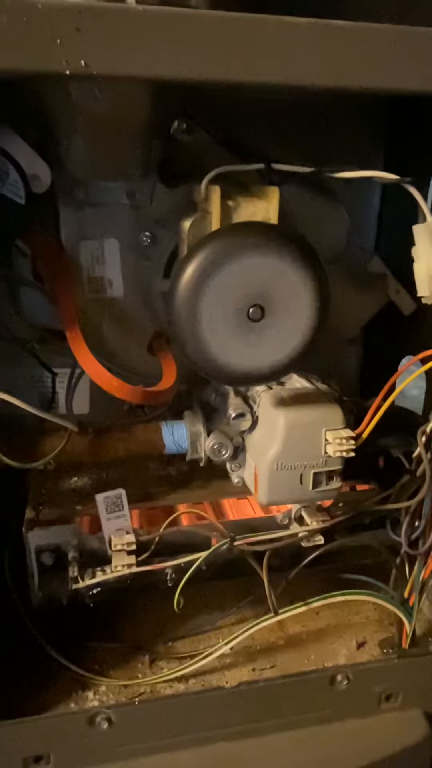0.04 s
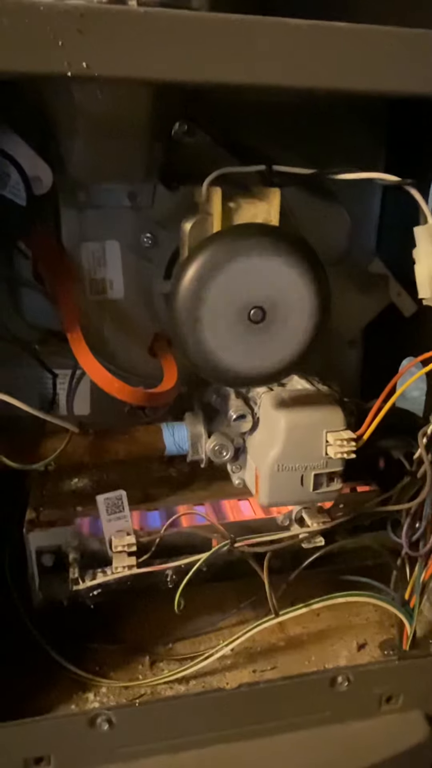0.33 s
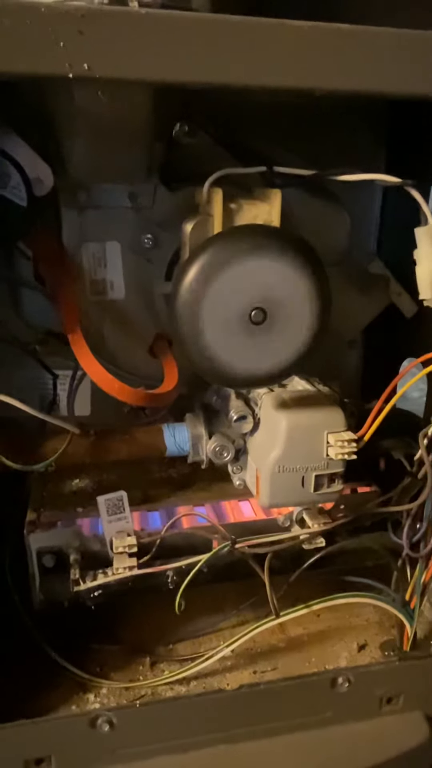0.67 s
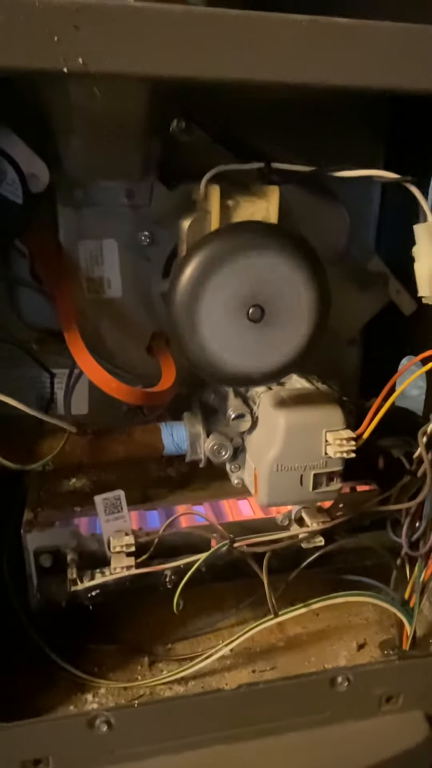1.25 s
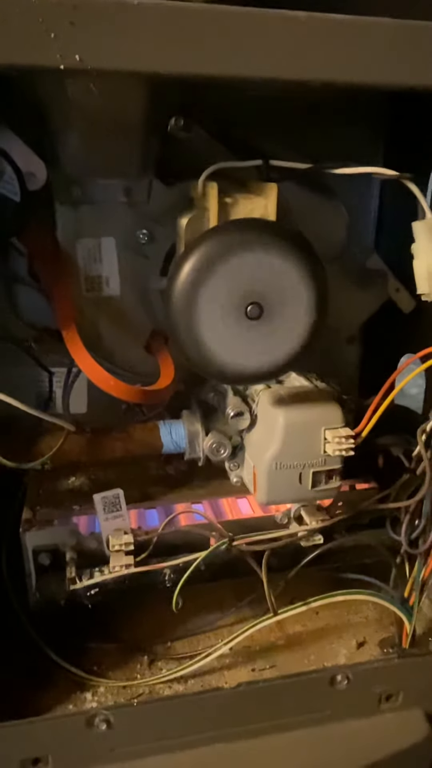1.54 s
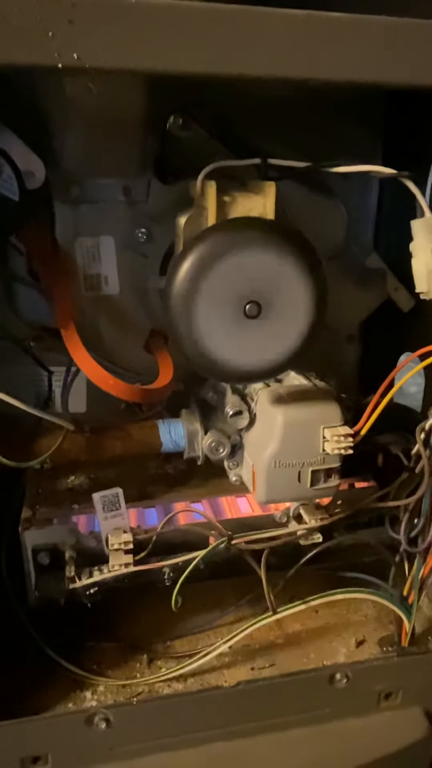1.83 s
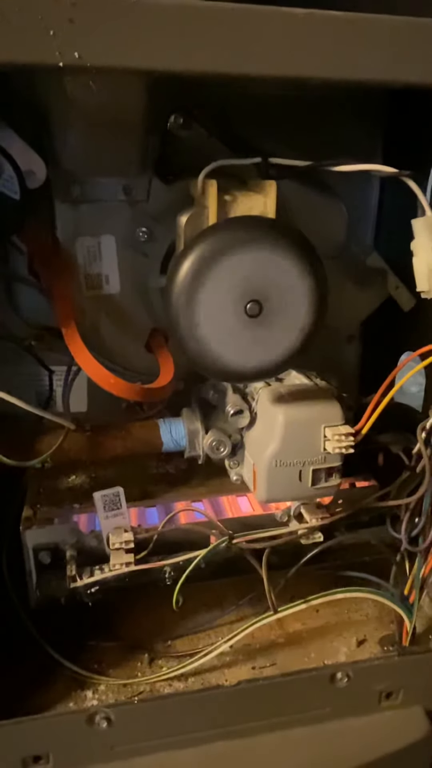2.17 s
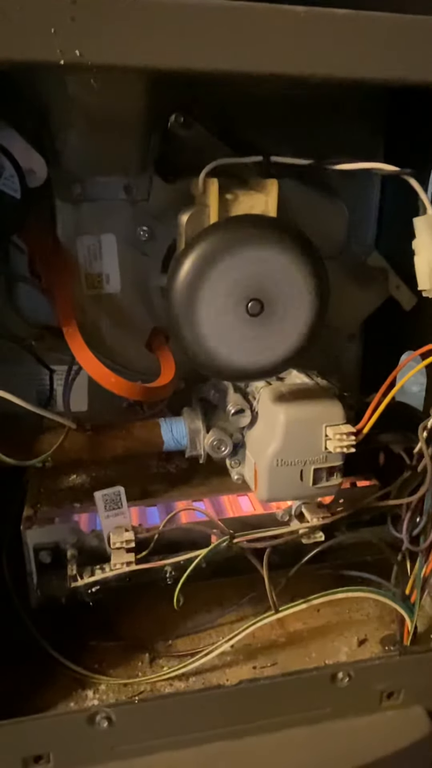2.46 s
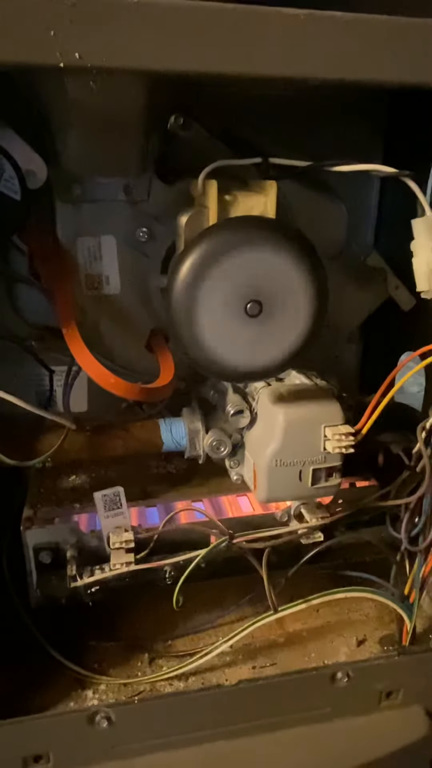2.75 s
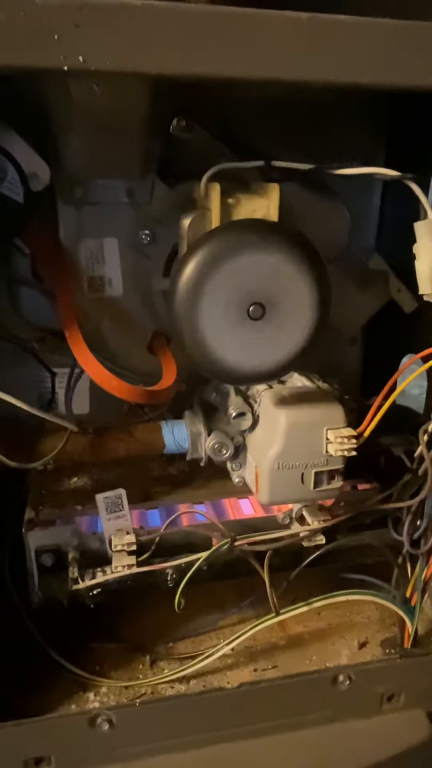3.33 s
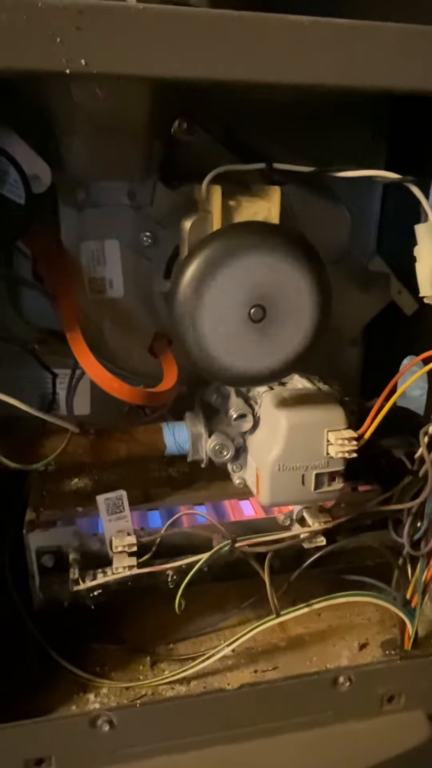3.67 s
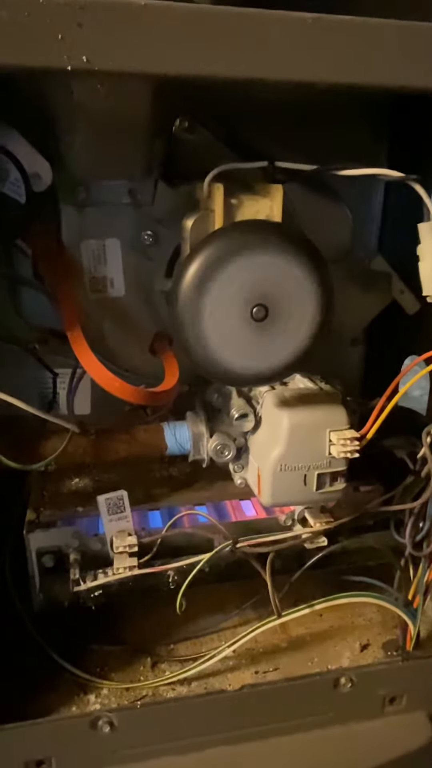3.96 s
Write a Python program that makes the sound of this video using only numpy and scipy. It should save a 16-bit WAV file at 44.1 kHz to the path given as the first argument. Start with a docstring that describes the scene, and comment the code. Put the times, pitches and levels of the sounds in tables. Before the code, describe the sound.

A gas furnace runs close by indoors, its small blower rushing, whining and humming from the start while low flames flutter. At about 0.5 seconds the burners catch with a puff and build into a roar over a deep, lumpy rumble, and the gas hiss brightens. The blower speeds up slightly between 0.5 and 2 seconds, and the furnace burns steadily until the end at about 4 seconds.

```python
"""A gas furnace heard close up at its open cabinet, indoors.
From the start a small draught blower rushes, whines and hums while low flames flutter.
Over the first second the gas valve opens to full flow: the flames catch with a puff, then roar
into the heat exchanger tubes over a lumpy rumble, and the hiss of the jets brightens.
As the flue gas gets hot the blower speeds up slightly, and the furnace burns on to the end."""
import sys
import numpy as np
from scipy import signal
from scipy.fft import rfft, irfft
from scipy.io import wavfile
from scipy.ndimage import uniform_filter1d, map_coordinates

SR = 44100
rng = np.random.default_rng(int(sys.argv[2]) if len(sys.argv) > 2 else 0)


def int16_out(signal):
    """Quantize to a 16-bit WAV file."""
    q = np.round(np.clip(np.atleast_2d(signal).T, -1, 1) * 32767)
    wavfile.write(sys.argv[1], SR, q.astype(np.int16))


N = 176400
TIME, HZ = np.arange(N) / SR, np.maximum(np.arange(N // 2 + 1) * SR / N, 1)

# the blower picking up speed: (time [s], shaft speed [turns/s])
SHAFT_SPEED = [(0, 57.2), (.48, 57.15), (.75, 57.65), (1.1, 58.02), (1.7, 58.2), (2.6, 58.24), (4, 58.24)]


def from_db(db):
    """Decibels to gain."""
    return 10 ** (np.asarray(db) / 20)


def rms_one(x):
    """Scale to rms 1."""
    return x / np.sqrt(np.mean(x ** 2) + 1e-20)


def in_time(points):
    """An automation curve at every sample."""
    return np.interp(TIME, *np.transpose(points))


def over_hz(points):
    """A curve at every frequency, joined on a log axis."""
    hz, value = np.transpose(points)
    return np.interp(np.log(HZ), np.log(hz), value)


def spectrum(points, skirt_db_per_octave=31):
    """EQ gain at every frequency, rolling off above the last point."""
    octaves_above = np.maximum(np.log2(HZ / points[-1][0]), 0)
    return from_db(over_hz(points) - skirt_db_per_octave * octaves_above)


def resonance(hz, width_hz):
    """Gain of a resonance with steep skirts."""
    return 1 / (1 + ((HZ - hz) / (.7 * width_hz)) ** 2)


def drift(rate_hz):
    """Slow random modulation, rms 1."""
    return rms_one(irfft(rfft(rng.standard_normal(N)) / (1 + (HZ / rate_hz) ** 2), N))


def bump(at_s, half_s):
    """A bell-shaped envelope of height 1."""
    return np.exp(-.5 * ((TIME - at_s) / half_s) ** 2)


def sine(cycles):
    """A sine with a random starting phase, rms 1."""
    return np.sqrt(2) * np.sin(2 * np.pi * (cycles + rng.random()))


def turbulence(colour):
    """Coloured stereo noise whose balance, width and phase vary with frequency, rms 1."""
    # panning: (frequency [Hz], left minus right [dB])
    balance = [(100, 0.1), (230, 1), (380, 2), (480, 5), (700, 8.5), (900, 4), (1300, 3.5), (1700, -1),
               (2200, -2.5), (2600, -2.5), (3100, 3.5), (3500, -1), (4400, -1.5), (5500, -0.5), (12000, 1)]
    # how alike the two sides are: (frequency [Hz], likeness [0-1])
    likeness = [(100, 1), (250, 1), (500, 0.98), (700, 0.95), (850, 0.37), (1100, 0.69), (1700, 0.8),
                (2280, 0.9), (2700, 0.43), (4500, 0.24), (5200, 0.81), (6100, 0.97), (6600, 1), (8100, 1),
                (8900, 0.2), (10200, .97), (12000, 0.6), (13100, .99), (14600, 0.99)]
    # phase between the sides: (frequency [Hz], left lead [rad])
    lead = [(280, 0), (460, .4), (720, .3), (900, -.55), (1400, -.4), (2300, .2), (3000, 1.4), (4400, 1.4),
            (5100, .1), (5900, .9), (6600, 3.05), (8100, 3.25), (8500, 4.4), (9800, 6.1), (11100, 6.4),
            (12200, 7.9), (13100, 9.35), (14700, 9.55), (15400, 12)]
    mid, side = rfft(rng.standard_normal((2, N)))
    alike = np.clip(over_hz(likeness), 0, 1)
    left_right = np.array([[1], [-1]])
    pair = np.sqrt(1 + alike) * mid + left_right * np.sqrt(1 - alike) * side
    pan = from_db(left_right * over_hz(balance) / 2)
    phase_shift = np.exp(.5j * left_right * over_hz(lead))
    return rms_one(irfft(pair * pan / np.hypot(*pan) * colour * phase_shift, N))


def resonating(modes):
    """Turbulence ringing in a set of resonances, each at its own level."""
    power = sum(from_db(db) ** 2 * rms_one(resonance(hz, width)) ** 2 for hz, width, db in modes)
    return np.sqrt(power.mean()) * turbulence(np.sqrt(power))


def gliding(pair, ratio):
    """Varispeed: bend a stereo sound by a slowly changing pitch ratio."""
    position = np.cumsum(ratio) % N
    return np.array([map_coordinates(x, [position], order=3, mode="nearest") for x in pair])


def blower_air():
    """Air rushes through the blower housing, whose resonances rise as the gas gets hot."""
    # colour of the rush: (frequency [Hz], relative level [dB])
    air_eq = [(400, -7), (870, -1.5), (980, 2), (1350, -2), (1650, -0.5), (1950, 0), (2200, 0.5),
              (2550, -2), (2750, -5.5), (3150, -3.5), (3300, -12), (4300, -12), (5400, -18), (6000, -20.5),
              (6700, -31)]
    # housing resonances: (frequency [Hz], width [Hz], level [dB])
    housing_modes = [(846, 23, -59), (1167, 31, -55.5), (1850, 42, -52.5), (2155, 120, -48.5),
                     (2297, 97, -42), (2500, 70, -59), (2844, 57, -52.5)]
    rush = from_db(-37) * turbulence(spectrum(air_eq))
    warming = (in_time(SHAFT_SPEED) / SHAFT_SPEED[-1][1]) ** 1.1   # pitch rises along with the shaft
    return rush + gliding(resonating(housing_modes), warming)


def blower_motor(flow_db, shaft_wander=.00062, waver_db=2, mains_hz=60):
    """The motor whines on multiples of its shaft rate and hums at twice the mains."""
    # whine: (shaft multiple [x], level [dB], left minus right [dB], flow tracking [dB/dB])
    partials = [(2, -35, 1.5, 0.31), (16, -55.5, 10, .5), (18, -57.5, -2, -0.4), (34, -47.5, -3.5, -0.23)]
    turns = np.cumsum(in_time(SHAFT_SPEED) * (1 + shaft_wander * drift(rate_hz=6.2))) / SR
    whine = 0
    for multiple, db, pan_db, tracking in partials:
        tone = sine(round(multiple) * turns)
        level_db = db + tracking * flow_db + waver_db * drift(rate_hz=2.8)
        whine = whine + tone * from_db(level_db + np.array([[.5], [-.5]]) * pan_db)
    hum = from_db(-33) * sine(2 * mains_hz * TIME)
    return whine + hum


def flames(flow_db):
    """Flames flutter while low, then roar and set the burner tubes ringing."""
    # flutters and the catch: (time [s], half length [s], centre [Hz], width [Hz], level [dB])
    flutters = [(.06, .009, 250, 90, -29.5), (.088, .008, 315, 110, -23.5), (.207, .012, 370, 160, -24.5),
                (.251, .013, 340, 140, -24.5), (.451, .009, 280, 400, -26), (.453, .007, 1100, 1300, -35),
                (.553, .019, 230, 120, -26)]
    # colour of the roar: (frequency [Hz], relative level [dB])
    roar_eq = [(90, -33), (150, 1.5), (195, 0), (240, -2), (268, -9.5), (330, -5.5), (385, -8.5),
               (470, -4.5), (550, -9.5), (620, -15), (760, -22), (1000, -23.5), (2000, -49)]
    # tube resonances: (frequency [Hz], width [Hz], level at full flow [dB])
    tube_modes = [(221.4, 7.8, -33.5), (354.5, 23, -42.5), (398, 25, -46.5), (467.7, 10.4, -41.5),
                  (503, 34, -39.5), (541, 33, -40.5), (578, 17, -42), (663, 18, -48.5),
                  (692.2, 22.4, -37.5), (738, 23, -44.5)]
    roar = from_db(-27 + .2 * flow_db) * turbulence(spectrum(roar_eq))
    tubes = from_db(flow_db) * resonating(tube_modes)
    flutter = sum(bump(at_s, half_s) * resonating([band]) for at_s, half_s, *band in flutters)
    return flutter + roar + tubes


def combustion_rumble(flow_db, compression=.3):
    """The deep, lumpy beat of combustion; the rumble swells briefly at set moments."""
    # colour of the low end: (frequency [Hz], relative level [dB])
    rumble_eq = [(20, -48), (32, -26), (42, -18), (55, -3.5), (75, -2.5), (92, 1), (114, 3), (134, -5.5),
                 (155, -1.5), (180, -11.5), (260, -29)]
    # low swells of the rumble: (time [s], half length [s], pitch [Hz], level [dB])
    swells = [(.308, .011, 85, -23), (.348, .007, 130, -22), (.459, .008, 88, -15), (.595, .01, 120, -18),
              (.638, .013, 100, -22), (.775, .012, 105, -20.5), (.865, .011, 112, -20.5),
              (.957, .024, 113, -15.8), (1.065, .012, 105, -19), (1.367, .017, 105, -16.5),
              (1.422, .014, 112, -18.5), (1.565, .015, 104, -19), (1.645, .01, 115, -21),
              (1.96, .016, 105, -18), (2.06, .013, 92, -18), (2.17, .01, 112, -18),
              (2.41, .012, 110, -19.5), (3.055, .02, 110, -18), (3.272, .016, 116, -18),
              (3.33, .014, 116, -18.7), (3.447, .015, 108, -19)]
    noise = turbulence(spectrum(rumble_eq))
    envelope = np.sqrt(uniform_filter1d(np.abs(signal.hilbert(noise[0])) ** 2, size=1800) + 1e-9)
    steadied = rms_one(noise / envelope ** compression)
    rumble = steadied * from_db(-25 + .45 * flow_db)
    for at_s, half_s, hz, db in swells:
        crossfade = bump(at_s, half_s)
        low_tone = from_db(db) * sine(hz * (TIME - at_s))
        rumble = (1 - crossfade) * rumble + crossfade * low_tone
    return rumble


def gas_jets(flow_db, hiss_db=-44.7, flicker_db=.88):
    """Gas hisses from the orifices: louder, brighter and more whistling as the flow rises."""
    # colour of the hiss: (frequency [Hz], relative level [dB])
    hiss_eq = [(3000, -20), (4300, -6), (4900, -4.5), (5500, -3.5), (6200, 0), (6700, -3), (7500, -0.3),
               (8300, -2), (9000, -3.8), (9500, -.7), (10300, .5), (10650, -2), (11100, 1), (12400, 1.5),
               (12900, 2), (13300, -3), (13700, 1), (14200, -4.5), (14800, -3.5), (15300, -7),
               (15800, -6.5)]
    # how the hiss opens up: (low edge [Hz], high edge [Hz], flow tracking [dB/dB])
    hiss_bands = [(2000, 8000, -.03), (8000, 11000, .17), (11000, 14500, .45), (14500, 18000, .25)]
    # jet whistles: (frequency [Hz], width [Hz], level at full flow [dB])
    whistle_peaks = [(9730, 130, -62), (11700, 160, -61), (11850, 100, -51.5), (12000, 200, -56),
                     (12700, 230, -54)]
    # burner throat resonances: (frequency [Hz], width [Hz], level [dB])
    throat_modes = [(3770, 130, -62.5), (5280, 75, -64.5), (5770, 89, -63.5), (8740, 84, -67)]
    colour = rms_one(spectrum(hiss_eq))
    hiss = 0
    for low, high, tracking in hiss_bands:
        band = colour * (HZ >= low) * (HZ < high)
        band_rms = np.sqrt(np.mean(band ** 2))
        hiss = hiss + from_db(hiss_db + tracking * flow_db) * band_rms * turbulence(band)
    whistles = from_db(1.8 * flow_db) * resonating(whistle_peaks)
    throats = resonating(throat_modes)
    return (hiss + whistles + throats) * from_db(flicker_db * drift(rate_hz=28))


def scene():
    """One gas flow drives the burners; the blower runs beside them."""
    # the valve opening: (time [s], gas flow relative to full [dB])
    gas_flow = [(0, -19), (.28, -12.5), (.45, -3.5), (.6, -1), (.72, -0.4), (1.2, 0), (4, -1.1)]
    flow_db = in_time(gas_flow)
    burners = combustion_rumble(flow_db) + flames(flow_db) + gas_jets(flow_db)
    return burners + blower_air() + blower_motor(flow_db)


def record(dry):
    """A steep low-pass takes off the very top."""
    cutoff_hz = 15850
    return signal.sosfilt(signal.ellip(12, .1, 90, cutoff_hz, fs=SR, output="sos"), dry)


dry = scene()
out = record(dry)
int16_out(out)
```